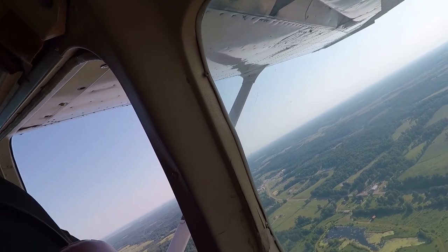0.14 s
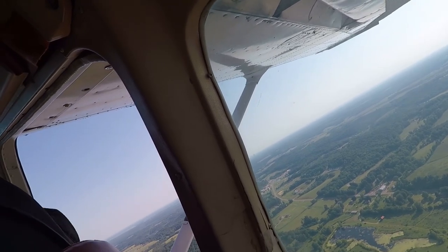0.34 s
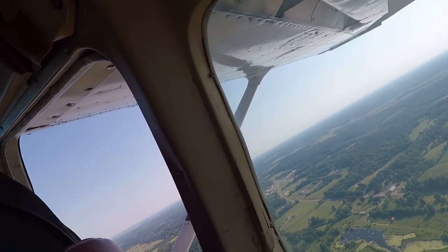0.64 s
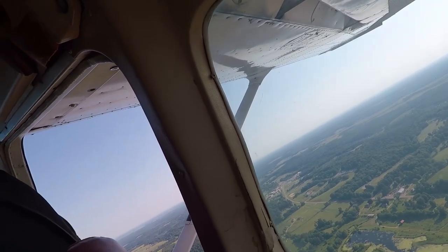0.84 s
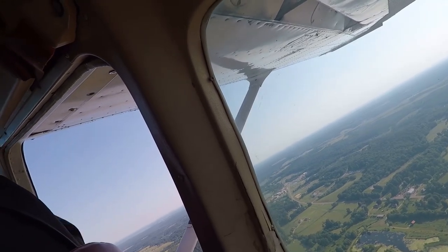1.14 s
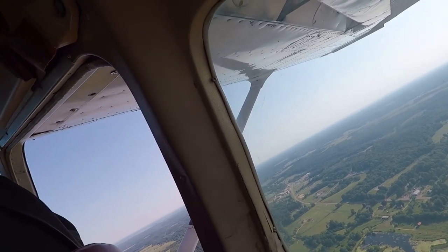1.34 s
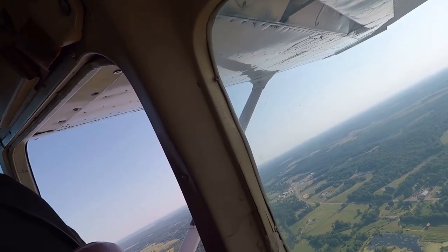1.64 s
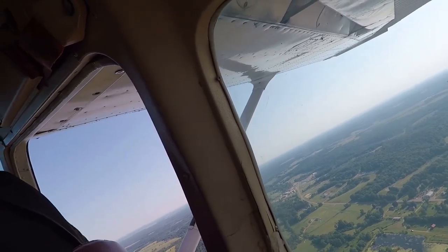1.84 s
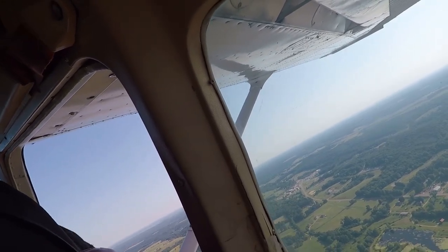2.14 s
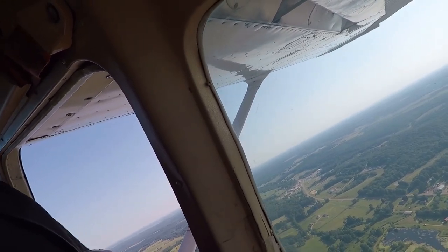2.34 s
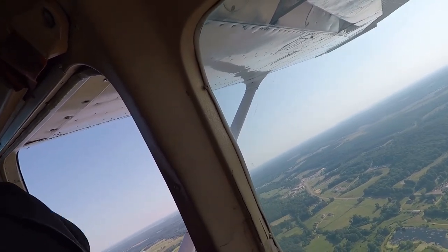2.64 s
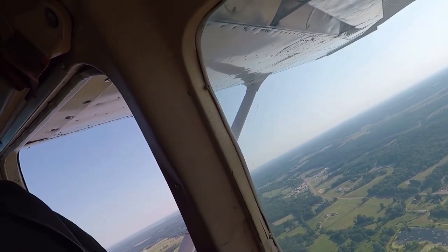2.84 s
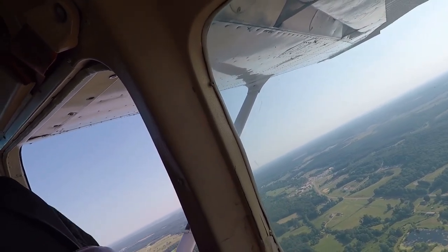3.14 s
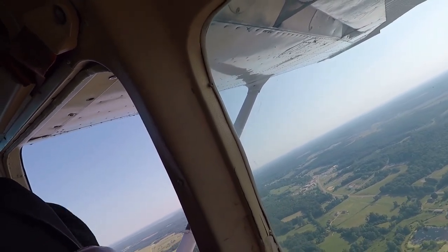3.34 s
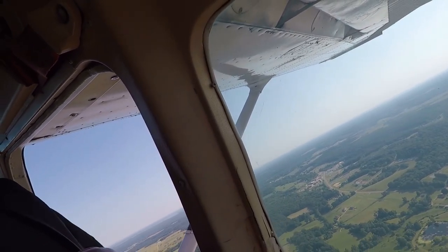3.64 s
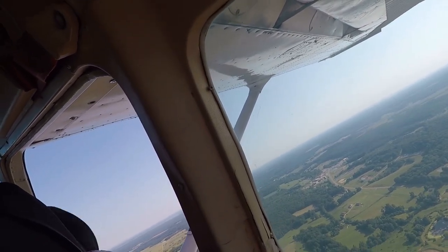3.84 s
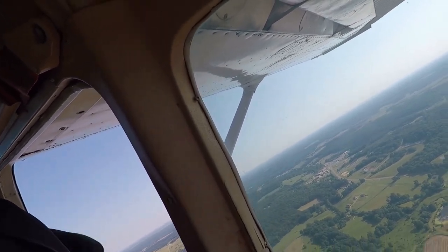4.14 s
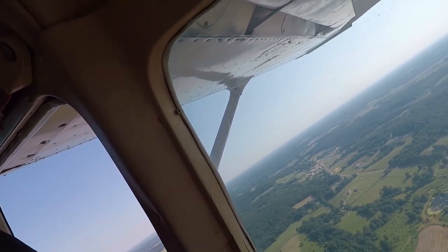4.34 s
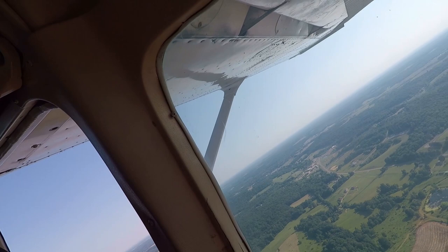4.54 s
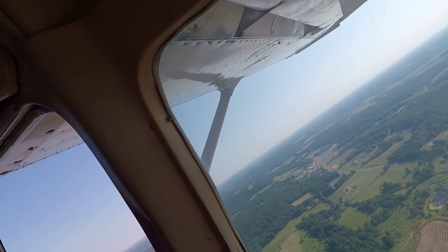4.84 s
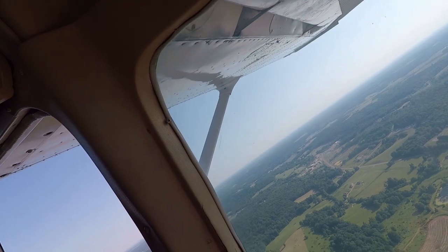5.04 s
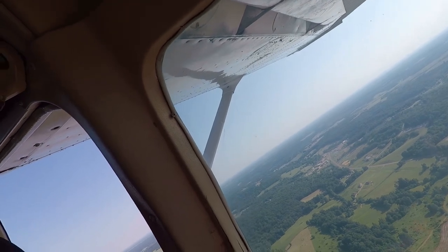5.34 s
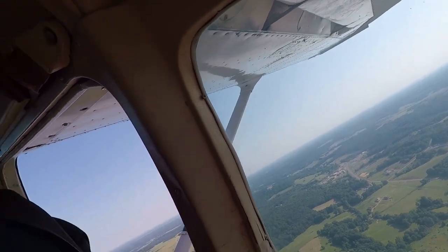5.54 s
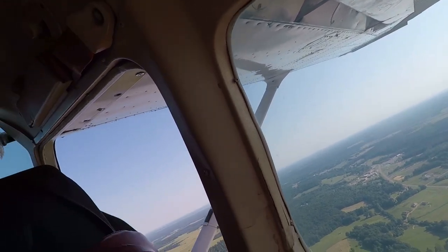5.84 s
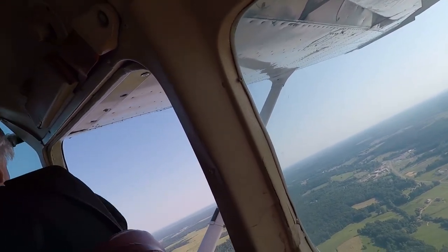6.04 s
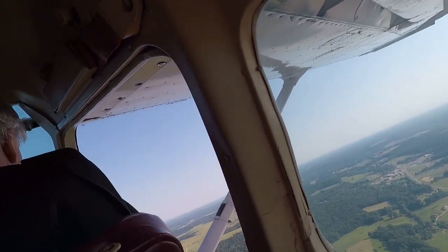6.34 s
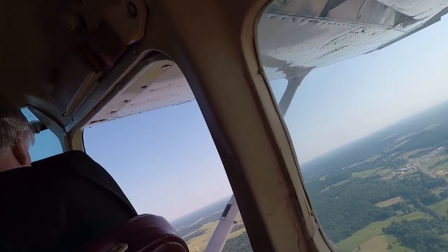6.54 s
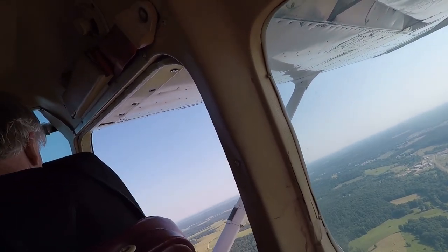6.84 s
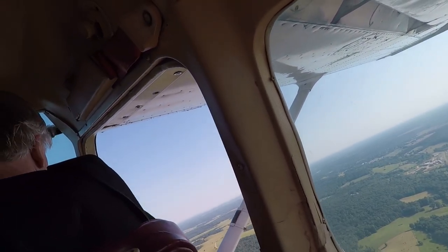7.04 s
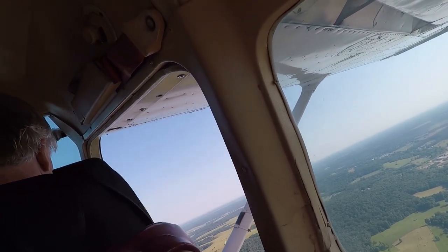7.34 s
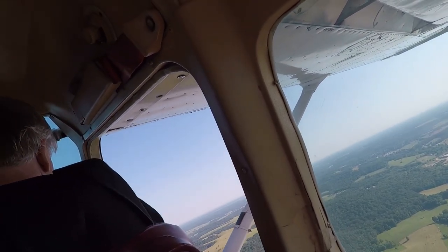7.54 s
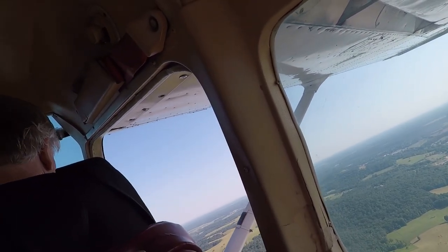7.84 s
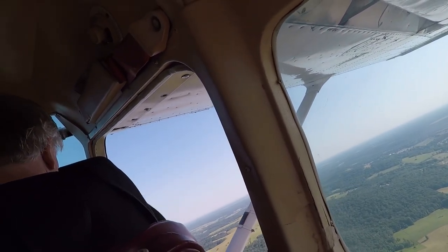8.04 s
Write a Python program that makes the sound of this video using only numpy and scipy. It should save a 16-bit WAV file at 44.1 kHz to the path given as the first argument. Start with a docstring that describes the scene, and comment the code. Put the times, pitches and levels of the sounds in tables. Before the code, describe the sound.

A light airplane's propeller and engine drone steadily inside the cabin, with low rumble, air hiss and wind crackling on the microphone.

```python
"""Light airplane cabin in cruise

A two-blade propeller and engine drone over the rumble of buffeted skin panels and slipstream hiss.
A draught flutters across the microphone in short crackling puffs and snaps. Brief high ticks sound,
many landing with the puffs. The loud bass works the recorder's gain control."""
import sys
import numpy as np
from scipy import signal
from scipy.fft import rfft, irfft, next_fast_len
from scipy.io import wavfile
from scipy.ndimage import uniform_filter1d, minimum_filter1d

SR = 44100
rng = np.random.default_rng(int(sys.argv[2]) if len(sys.argv) > 2 else 0)


def log_audio(samples):
    """Write samples as a 16-bit WAV file to the path given in sys.argv[1]."""
    # one column per channel
    frames = np.atleast_2d(samples).T
    # limit to full scale, then quantise
    limited = np.clip(frames, -1, 1)
    pcm = np.round(limited * 32767).astype(np.int16)
    wavfile.write(sys.argv[1], SR, pcm)


N = 362061
T = np.arange(N) / SR

# Slipstream hiss and high buzz: time_s, hiss_db, buzz_db
HISS_AND_BUZZ = [(0, -39, -52.5), (1.5, -42.5, -52.5), (2.7, -40, -52), (3.2, -41, -58.5),
                 (4.2, -41.5, -55.5), (5.3, -41.5, -52), (6.0, -40.5, -54), (6.72, -39.5, -51),
                 (6.9, -42.5, -59), (7.8, -41.5, -56), (8.05, -43.5, -78), (8.21, -44, -81)]


def gain_of(db):
    """Decibels to amplitude factor."""
    return 10 ** (np.asarray(db) / 20)


def unit_rms(x):
    """Scale to rms 1."""
    return x / np.sqrt(np.mean(x ** 2) + 1e-20)


def curves(rows):
    """One curve over T per column after time_s."""
    time_s, *columns = np.transpose(rows)
    return [np.interp(T, time_s, c) for c in columns]


def noise(spectrum):
    """Steady noise, rms 1, shaped by rows of freq_hz, density_db."""
    size = next_fast_len(N)
    hz, db = np.transpose(spectrum)
    colour_db = np.interp(np.log(np.fft.rfftfreq(size, 1 / SR) + 1), np.log(hz), db)
    return unit_rms(irfft(rfft(rng.standard_normal(size)) * gain_of(colour_db), size)[:N])


def drift(hz):
    """Random wander, rms 1, mostly slower than hz."""
    return noise([(1, 0), (hz, 0), (4 * hz, -24), (SR / 2, -120)])


def band(x, lo_hz, hi_hz):
    """Band-pass filter."""
    return signal.sosfilt(signal.butter(2, [lo_hz, hi_hz], "band", fs=SR, output="sos"), x)


def resonance(x, centre_hz, width_hz):
    """Band-pass along the curve centre_hz; output rms 1."""
    carrier = np.exp(2j * np.pi * np.cumsum(centre_hz) / SR)
    baseband = signal.lfilter(*signal.butter(2, width_hz / 2, fs=SR), x / carrier)
    return unit_rms((carrier * baseband).real)


def steadied(x, key, span_samples=260):
    """Flatten swells of x by the running rms of key."""
    return x / np.sqrt(uniform_filter1d(key ** 2, span_samples) + 0.21 * np.mean(key ** 2))


def bursts(rows):
    """Envelope, steep swell and slower fade, from rows of centre_s, height, width_s."""
    envelope = np.zeros(N)
    for centre_s, height, width_s in rows:
        start = max(round(centre_s * SR) - 1500, 0)
        part = envelope[start:start + 3500]
        offset = 2 * (T[start:start + 3500] - centre_s) / max(width_s, .002)
        falloff = np.where(offset > 0, abs(offset / 0.82) ** 1.57, (offset / 0.84) ** 2)
        np.maximum(part, height * np.exp(-.5 * falloff), out=part)
    return envelope


def high_ticks():
    """Brief ticks around 6-7 kHz, many landing with the puffs, over a faint flickering buzz."""
    # High ticks: centre_s, level_db
    ticks = [(0.32, -39), (0.601, -41), (0.701, -39), (1.74, -39), (2.265, -39), (3.13, -40.5),
             (3.659, -40.5), (6.441, -42), (6.63, -35), (7.495, -42)]
    # Noise bands of ticks and buzz: centre_hz, width_hz, relative_db
    bands = [(6390, 1080, 8.5), (7330, 2200, 5.5), (8780, 280, -7.5)]
    ticking = bursts((centre_s, gain_of(db), .008) for centre_s, db in ticks)
    flicker = unit_rms(gain_of(16 * np.tanh(0.4 * drift(27))))
    buzz = gain_of(curves(HISS_AND_BUZZ)[1]) * flicker
    white = rng.standard_normal(N)
    ring = sum(gain_of(db) * unit_rms(band(white, hz - width_hz / 2, hz + width_hz / 2))
               for hz, width_hz, db in bands)
    return unit_rms(band(ring, 5400, 12000)) * np.hypot(ticking, buzz)


def slipstream(blade_passes, flutter_db):
    """Hiss past the windows, pulsed a little by each blade and by the gusts."""
    # Slipstream spectrum: freq_hz, density_db
    spectrum = [(700, -35.5), (1200, -20.5), (1550, 1.5), (2400, -6), (2900, -4.5), (6000, -9),
                (7000, -20.5), (8500, -23), (9500, -28), (10400, -30), (12000, -85.5)]
    level_db = curves(HISS_AND_BUZZ)[0] + 0.035 * flutter_db + 0.61 * drift(3.9)
    pulse = 1 + 0.081 * np.sin(2 * np.pi * blade_passes)
    return gain_of(level_db) * pulse * noise(spectrum)


def small_puffs(strength_db, count=220):
    """Lesser eddies at random times, scaled to the draught; columns as strong_puffs."""
    when, size, length = rng.random((count, 3)).T
    level_db = strength_db[(when * N).astype(int)] + 1 + 4 * size
    return np.transpose([when * N / SR, level_db, np.full(count, -31.5), 0.0074 * (.5 + length)])


def draught():
    """Eddies brush the microphone: a fluttering bed and crackly puffs. Returns sound, flutter_db."""
    # Draught strength: time_s, level_db
    gusts = [(0, -36), (0.6, -32), (1.2, -31), (1.6, -39.5), (2.3, -34.5), (2.85, -31), (3.3, -36.5),
             (3.62, -30.5), (4.1, -37.5), (5.1, -34.5), (5.45, -34), (6.4, -33), (6.7, -29.5), (7.0, -33.5),
             (7.25, -32), (7.45, -35), (7.75, -27), (8.21, -36.5)]
    # Strong eddies: centre_s, level_db, treble_re_level_db, width_s
    strong_puffs = [(0.429, -18.5, -30, 0.013), (0.544, -23, -22, 0.014), (0.606, -14.5, -26, 0.0069),
                    (0.686, -16.5, -12, 0.016), (0.706, -14, -12, 0.014), (0.778, -16, -7, 0.02),
                    (0.743, -18.5, -24, 0.011), (0.815, -15, -20, 0.013), (0.832, -21, -15, 0.013),
                    (0.862, -23, -24, 0.022), (0.955, -16, -18, 0.022), (0.992, -18, -17, 0.0063),
                    (1.053, -16.5, -15, 0.013), (1.089, -18, -14, 0.023), (1.176, -16.5, -15, 0.018),
                    (1.22, -17.5, -18, 0.019), (1.329, -21, -24, 0.019), (1.741, -14.5, -26, 0.01),
                    (1.873, -23, -13, 0.03), (1.916, -23, -26, 0.011), (2.196, -16.5, -18, 0.0097),
                    (2.207, -12, -33, 0.0046), (2.267, -14.5, -27, 0.01), (2.279, -10.5, -21, 0.0082),
                    (2.297, -18.5, -23, 0.023), (2.473, -11.5, -26, 0.0087), (2.716, -19.5, -24, 0.023),
                    (2.74, -9.5, -34, 0.0062), (2.753, -18.5, -14, 0.011), (2.815, -26, -15, 0.02),
                    (2.875, -21, -19, 0.04), (2.894, -13.5, -19, 0.0066), (3.038, -18, -30, 0.0071),
                    (3.074, -16, -13, 0.0052), (3.1, -20.5, -18, 0.018), (3.128, -19, -11, 0.02),
                    (3.247, -22, -21, 0.025), (3.272, -18.5, -11, 0.0089), (3.359, -10.5, -37, 0.0053),
                    (3.442, -10, -9.5, 0.012), (3.546, -16.5, -27, 0.0098), (3.687, -14.5, -21, 0.0074),
                    (3.846, -21, -24, 0.0053), (3.884, -19.5, -18, 0.0076), (3.968, -22.5, -23, 0.0084),
                    (4.444, -13.5, -26, 0.0045), (4.506, -10, -27, 0.011), (4.67, -19, -17, 0.023),
                    (5.31, -26, -28, 0.024), (5.362, -16.5, -29, 0.0093), (5.391, -15, -22, 0.025),
                    (5.487, -17, -30, 0.0064), (5.623, -18, -31, 0.011), (5.65, -12.5, -27, 0.0061),
                    (5.692, -13, -15, 0.01), (5.787, -17, -34, 0.0064), (5.825, -14.5, -18, 0.009),
                    (5.968, -18, -21, 0.028), (6.128, -15.5, -24, 0.012), (6.304, -13.5, -26, 0.0046),
                    (6.558, -13, -31, 0.005), (6.619, -11.5, -26, 0.0042), (6.632, -15.5, -30, 0.014),
                    (6.744, -23, -20, 0.04), (6.798, -17.5, -10.5, 0.0078), (6.904, -14.5, -29, 0.008),
                    (6.998, -16, -31, 0.017), (7.036, -19.5, -25, 0.0049), (7.156, -15.5, -15, 0.011),
                    (7.209, -18.5, -15, 0.02), (7.247, -20.5, -30, 0.038), (7.374, -22, -33, 0.0096),
                    (7.463, -13.5, -36, 0.0062), (7.495, -11.5, -34, 0.015), (7.527, -18.5, -20, 0.016),
                    (7.576, -17, -26, 0.02), (7.646, -16.5, -12, 0.014), (7.696, -14.5, -7, 0.01),
                    (7.75, -23, -20, 0.037), (7.848, -11.5, -28, 0.0043), (7.898, -14.5, -31, 0.014),
                    (7.912, -20, -9, 0.006), (7.945, -14, -9, 0.0097), (8.002, -20.5, -12, 0.023),
                    (8.028, -19.5, -28, 0.02), (8.095, -22, -8, 0.0093), (8.146, -16, -27, 0.0088),
                    (8.165, -16, -17, 0.021), (8.197, -21.5, -29, 0.016)]
    # Draught spectrum: freq_hz, density_db
    spectrum = [(80, -22), (200, 7.5), (400, 1.5), (800, -1.5), (1300, -9), (1900, -17), (2600, -28),
                (5000, -33.5), (7000, -36), (9500, -55), (11000, -81.5)]
    strength_db = curves(gusts)[0]
    flutter_db = 3.43 * drift(23) + 3.9 * drift(59)
    centre_s, level_db, treble_db, width_s = np.vstack([strong_puffs, small_puffs(strength_db)]).T
    crackle = gain_of(2.54 * drift(160))
    air = crackle * noise(spectrum)
    air = steadied(air, band(air, 307, 2500))
    treble_air = crackle * band(band(rng.standard_normal(N), 1100, 2700), 900, 5400)
    puffs = bursts(zip(centre_s, gain_of(level_db), width_s))
    # Treble peaks and dies first.
    edges = bursts(zip(centre_s - 0.092 * width_s, gain_of(level_db + treble_db), 0.59 * width_s))
    body = air * np.hypot(gain_of(strength_db + flutter_db), puffs)
    return body + steadied(treble_air, treble_air) * edges, flutter_db


def snaps():
    """Cracks at the front of hard puffs: a few damped, sagging cycles with a spit of treble."""
    # Draught cracks: start_s, relative_db, pitch_hz, treble_re_level_db
    cracks = [(0.603, -12.5, 970, -19), (0.6917, -7.5, 1080, -17), (0.7701, -11, 1270, -12),
              (0.8086, -21, 1240, -12), (1.1706, -13, 1190, -12), (1.7394, -23, 945, -20),
              (2.2653, -16, 985, -17), (2.4668, -18, 1760, -20), (2.738, -13, 1040, -16),
              (2.8749, -15.5, 990, -12), (3.3568, -16, 960, -15), (3.4351, -15, 1520, -7),
              (4.5012, -25, 1210, -22), (5.382, -11.5, 930, -13), (5.686, -7.5, 1130, -18),
              (6.5571, -12, 910, -27), (6.6157, -12.5, 1450, -15), (6.7461, -14.5, 1110, -17),
              (6.9955, -14, 1110, -24), (7.1528, -7.5, 960, -23), (7.5702, -12, 950, -21),
              (7.6387, -10, 1290, -22), (7.844, -12.5, 1150, -12), (7.9382, -8, 1150, -20),
              (8.0935, -10.5, 1010, -25)]
    rise_s, decay_s, click_decay_s, length = .0012, .0017, .0007, 600
    track = np.zeros(N + length)
    t = np.arange(length) / SR
    attack = np.minimum(t / rise_s, 1)
    sag = .11 * (1 - t / decay_s).clip(-1)
    for start_s, db, pitch_hz, treble_db in cracks:
        spit = rng.standard_normal(length)
        jitter = 0.12 * uniform_filter1d(spit, size=9)
        cycles = np.cumsum(pitch_hz * (1 + sag + jitter)) / SR
        ring = np.exp(-t / decay_s) * np.sin(2 * np.pi * cycles)
        click = np.sign(spit) * np.exp(-abs(t - rise_s) / click_decay_s)
        click = band(band(click, 1500, 5600), 1500, 6100)
        treble = gain_of(treble_db) * click / abs(click).max()
        track[round(start_s * SR):][:length] += 2 * gain_of(db) * attack * (ring + treble)
    return track[:N]


def airframe():
    """Turbulence shakes the skin: lumpy rumble, roar, and a rising moan that swells and breaks off."""
    # Panel rumble spectrum: freq_hz, density_db
    rumble_spectrum = [(12, -13), (25, -5), (40, 0), (62, .5), (79, -3), (98, 0), (110, -3), (132, -3.5),
                       (148, -10.5), (165, -20), (220, -36), (2000, -120)]
    # Panel roar spectrum: freq_hz, density_db
    roar_spectrum = [(110, -7.5), (165, 4.5), (220, 3.5), (260, 0), (320, -5.5), (380, -7), (600, -21),
                     (1200, -23), (2500, -69), (9000, -100)]
    # Moan swells: peak_s, level_db, rise_s
    swells = [(0.16, -30, .15), (1.17, -21.5, 0.091), (4.5, -16, 0.19), (5.29, -20.5, 0.11)]
    break_off_s, climb_s = .039, .08
    rumble = gain_of(-13.5 + 1.6 * drift(22)) * noise(rumble_spectrum)
    roar = gain_of(-27.5 + 3.55 * drift(24)) * noise(roar_spectrum)
    envelope = sum(gain_of(db) * np.exp(-((T - peak_s) / np.where(T < peak_s, rise_s, break_off_s)) ** 2)
                   for peak_s, db, rise_s in swells)
    climb = sum(np.exp(-((T - peak_s - break_off_s) / climb_s) ** 2) for peak_s, _, _ in swells)
    moan = resonance(rng.standard_normal(N), centre_hz=220 + 71 * climb, width_hz=69)
    return rumble + roar + envelope * unit_rms(steadied(moan, moan, span_samples=900))


def propeller():
    """Blade beats and engine orders as wavering tones. Returns sound, running count of blade passes."""
    # Blade-pass rate: time_s, rate_hz
    blade_rate = [(0, 78.95), (2.7, 78.95), (3.0, 78.65), (7, 78.63), (8.21, 78.55)]
    # Propeller and engine orders: blade_rate_multiple, level_re_drone_db
    orders = [(.5, -22), (1, 0), (1.25, -19), (4, -28), (5, -37)]
    # Drone level: time_s, level_db
    drone_level = [(0, -11.5), (3.2, -12), (3.7, -10.6), (8.21, -10.6)]
    # Third blade harmonic: time_s, level_db
    third_level = [(0.0, -26.5), (0.16, -19.5), (0.34, -28.5), (1.5, -31), (1.7, -25), (1.85, -30),
                   (3.2, -31.5), (4.1, -34), (4.37, -22.5), (4.7, -38), (4.92, -24), (5.58, -34),
                   (6.17, -29.5), (6.4, -25), (6.6, -30), (7.4, -30), (8.21, -30)]
    blade_passes = np.cumsum(curves(blade_rate)[0]) / SR
    phase = 2 * np.pi * blade_passes
    # Higher orders waver more.
    tones = sum(gain_of(db + .3 * k * drift(22)) * np.cos(k * phase) for k, db in orders)
    third = gain_of(curves(third_level)[0] + 1.4 * drift(9)) * np.cos(3 * phase)
    return np.sqrt(2) * (gain_of(curves(drone_level)[0]) * tones + third), blade_passes


def scene():
    """All sources at one microphone."""
    drone, blade_passes = propeller()
    puffs, flutter_db = draught()
    mix = drone + airframe() + puffs + slipstream(blade_passes, flutter_db) + high_ticks() + snaps()
    return mix[None]


def record(dry):
    """Fast gain control evens out the bass swells; then soft overload and low-pass."""
    knee_db, cut_db_per_db, makeup_db = -6, .45, .21
    ceiling, cutoff_hz = 1.52, 10400
    crest = -minimum_filter1d(-abs(dry), 700)  # held for about one blade beat
    crest_db = 20 * np.log10(uniform_filter1d(crest, 500) + 1e-9)
    over_db = np.maximum(crest_db - knee_db, 0)
    levelled = dry * gain_of(makeup_db - cut_db_per_db * over_db)
    rounded = ceiling * np.tanh(levelled / ceiling)
    lowpass = signal.firwin(255, cutoff_hz, window=("kaiser", 9), fs=SR)
    return signal.oaconvolve(rounded, lowpass[None], "same")


dry = scene()
out = record(dry)
log_audio(out)
```